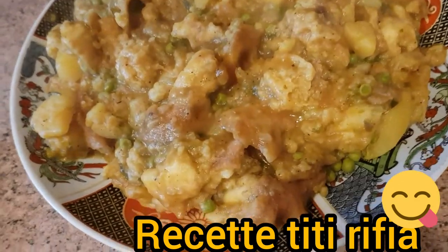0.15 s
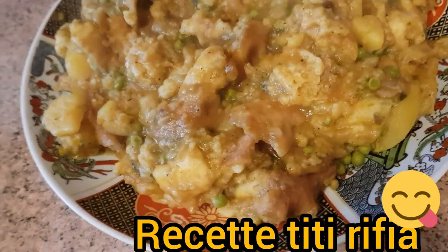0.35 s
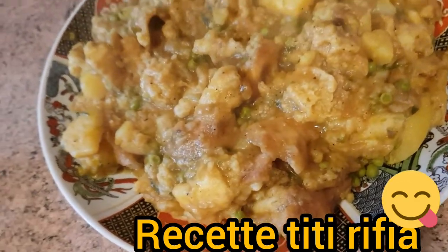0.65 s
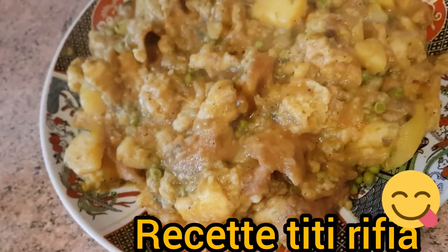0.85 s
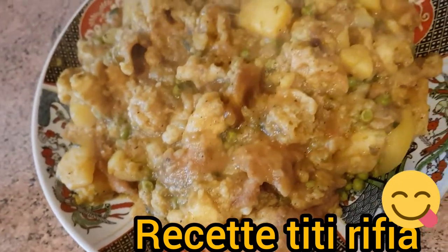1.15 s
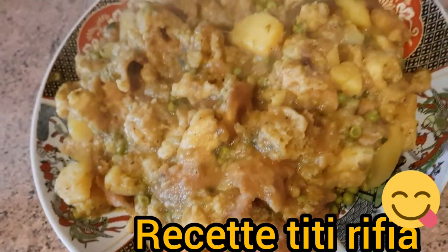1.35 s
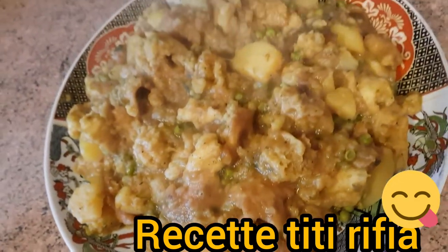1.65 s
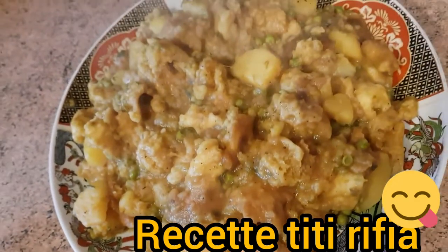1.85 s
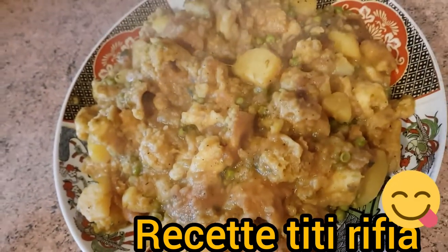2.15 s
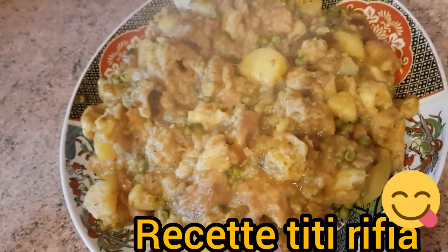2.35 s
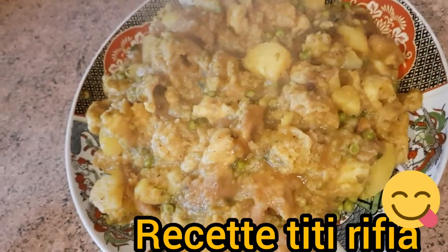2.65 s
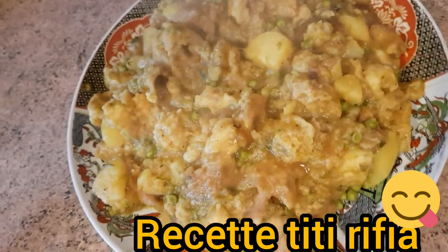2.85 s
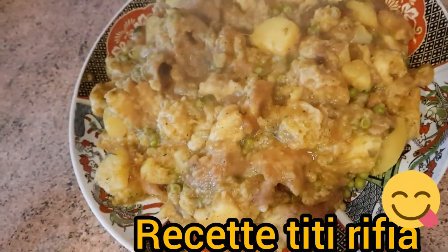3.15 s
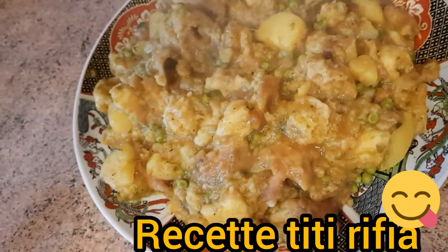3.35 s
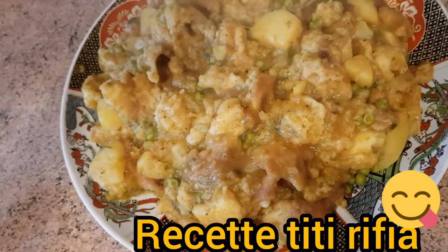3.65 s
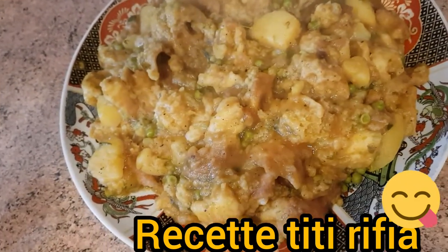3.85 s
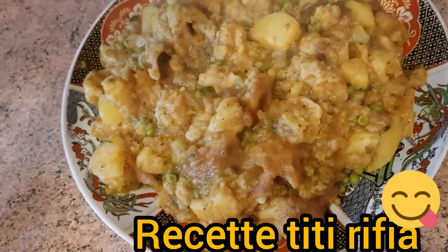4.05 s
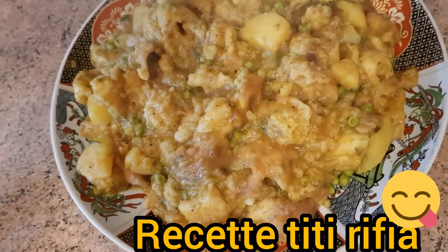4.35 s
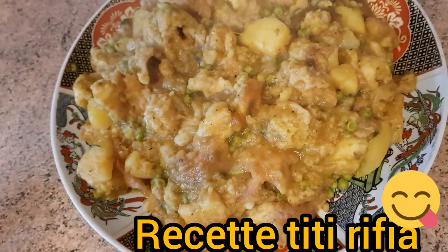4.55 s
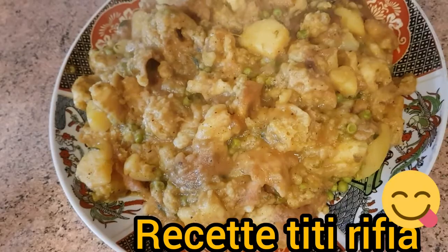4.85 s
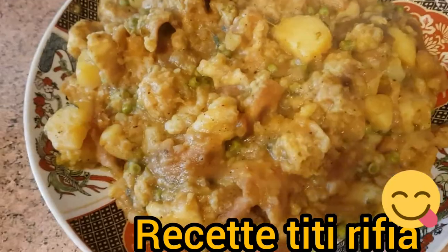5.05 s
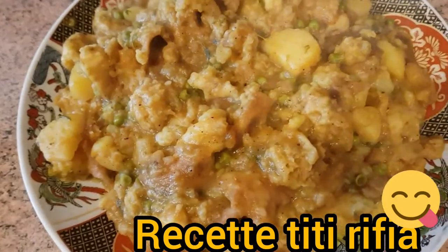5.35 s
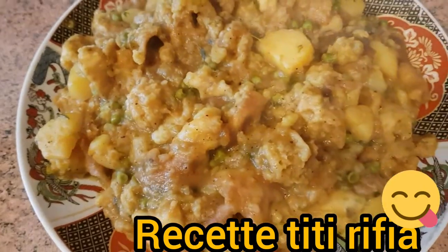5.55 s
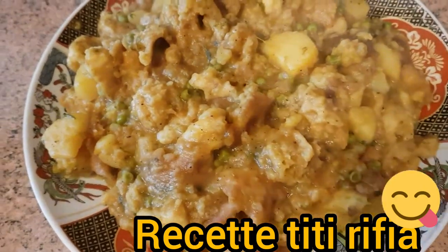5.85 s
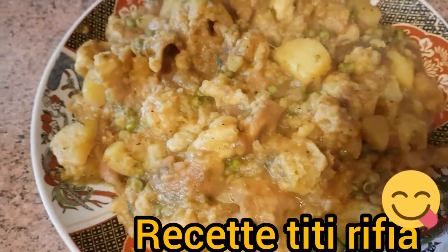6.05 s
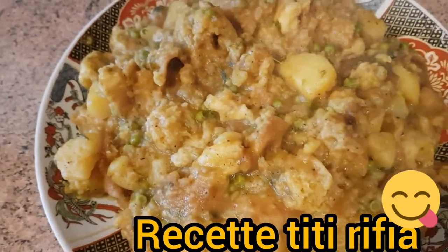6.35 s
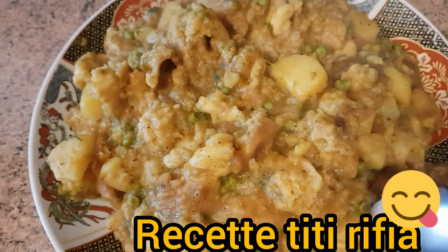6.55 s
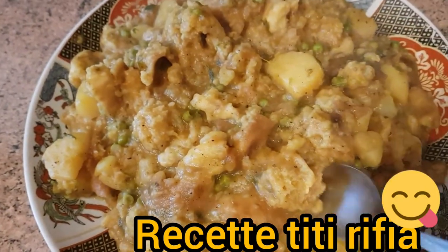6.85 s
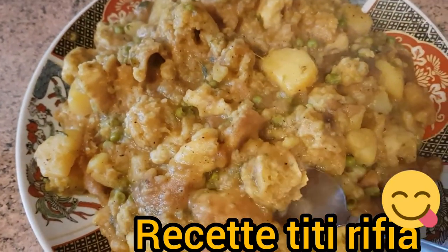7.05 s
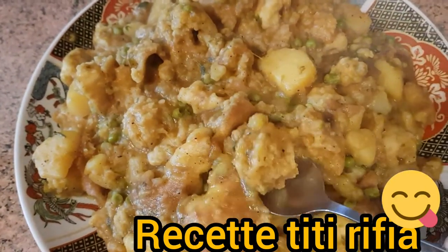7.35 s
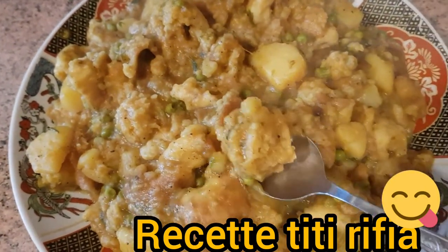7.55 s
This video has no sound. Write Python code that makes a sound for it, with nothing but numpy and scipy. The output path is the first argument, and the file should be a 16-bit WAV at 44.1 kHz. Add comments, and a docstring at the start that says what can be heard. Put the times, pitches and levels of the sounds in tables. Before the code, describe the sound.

A refrigerator hums and whines steadily in a quiet kitchen, a finger knocks loudly against the microphone, then a spoon ticks and squelches in saucy food.

```python
"""A refrigerator is heard first, in a quiet kitchen through a hand-held phone: shaft orders hum and whine,
a fan drones, and shaped noise gives moving air. A finger over the right microphone port bumps it (damped
oscillations of trapped air), then slips off with a loud knock that makes the gain control duck. A bird
chirps outside (falling tones); at 5.665 s the tones skip in phase and several levels step. Then a sleeve
rustles (shaped noise) and a spoon ticks and squelches in a dish (filtered bursts, decaying tones)."""
import sys
import numpy as np
from scipy.fft import rfft, irfft, next_fast_len
from scipy.io import wavfile
from scipy.ndimage import uniform_filter1d

SR = 44100
rng = np.random.default_rng(int(sys.argv[2]) if len(sys.argv) > 2 else 0)


def transcribe(signal):
    """Save signal, clipped to [-1, 1], as a 16-bit WAV file at the path in sys.argv[1]."""
    frames = np.atleast_2d(signal).T
    limited = np.clip(frames, -1, 1)
    pcm = np.round(limited * 32767).astype(np.int16)
    wavfile.write(sys.argv[1], SR, pcm)


N = 340011
TIME = np.arange(N) / SR
SKIP_AT_S, SKIPPED_S = 5.665, 0.28
AFTER = TIME > SKIP_AT_S
CLOCK = TIME + SKIPPED_S * AFTER  # time that drives the compressor phases

# Compressor tones, before PLACEMENT: [shaft order (rounded in use), left level/dB, right level/dB,
# change after the skip/dB]
HUM_ORDERS = [(1, -68.5, -70, 0), (2, -64, -63, 2), (3, -69, -66.5, 3), (7, -77.5, -77.5, -1),
              (9, -78.5, -75.5, -0.5), (11, -79.5, -74.5, 4), (12, -64.5, -66, 1.5), (13, -84, -73, -6.5),
              (20, -89, -89.5, 0.5), (23, -93, -85, -4.5), (30, -85, -96, 1)]
WHINE_ORDERS = [(51, -73.5, -71.5, 1.5), (55, -67.5, -59.5, -9), (56, -62.5, -64.5, -3.5),
                (57, -63.5, -67.5, -3), (60, -69.5, -71, -4), (58, -77, -80, 3.5), (61, -78.5, -77, 4.5),
                (62, -71, -66, -9), (67.63, -79.5, -71.5, -10), (73.8, -79.5, -74, 1), (80, -74.5, -72, 0),
                (87, -81, -74.5, -7), (114, -87, -80, 1), (164, -77.5, -85.5, 2.5)]
# Drift of the phone: [t/s, air level/dB, hum change/dB, whine change/dB, whine left-right/dB]
PLACEMENT = [(0, -63, 4.5, 0, -4.5), (.7, -59.5, 5.5, 1.5, -3.5), (1.5, -58, 3.5, -1, 3),
             (2.3, -58.5, -2, 2, -1.5), (2.8, -60, 1, 3, -2), (3.5, -58, 2.5, 1, 1),
             (4.5, -59, 0.5, 0.5, 0.5), (5.25, -59, 2.5, 1.5, 0.5), (5.45, -61, 0, 1, 1),
             (5.66, -58.5, 0, 2, 0), (5.67, -62, 1, -1, 0.5), (6.3, -60, 2, -.5, 1), (6.8, -62, 0.5, -1, 0),
             (7.71, -60, 0, -2.5, -1)]
# Noise spectra of low rumble, moving air, compressor casing and microphone hiss: [f/Hz, relative level/dB per Hz]
RUMBLE_SPECTRUM = [(20, -30), (36, -26), (46, -9), (56, 3), (75, -3), (120, -7), (170, -26), (260, -26),
                   (400, -59.5)]
AIR_SPECTRUM = [(88, -24.5), (150, 0.5), (236, -6.5), (304, -1.5), (490, -7.5), (625, -5.5), (752, -16.5),
                (982, -19.5), (1560, -27.5), (2320, -30), (2400, -20.5), (3120, -51.5), (5280, -120)]
CASING_SPECTRUM = [(700, -37), (1000, -17.5), (1300, -17), (2000, -26), (2400, -31), (2480, -6.5),
                   (2800, 1), (3300, -6), (3950, -3.5), (4900, -12), (5600, -6.5), (7200, -15.5),
                   (8100, -14), (9000, -26)]
HISS_SPECTRUM = [(4000, -42), (7000, -20.5), (9500, -11), (12500, 1), (14500, -4), (16000, -1)]
# Left-right likeness of the noise: [f/Hz, correlation -1 to 1]
LIKENESS = [(60, 0.98), (130, 0.85), (290, 0.67), (640, 0.059), (1410, -0.36), (3100, 0.26), (6820, -0.13),
            (15000, -0.01)]
# The blade tone sinks: [middle t/s, depth level/dB, half length/s]
FAN_DIPS = [(1.902, 13, 0.22), (2.95, 13, 0.45), (5.536, 12, 0.121)]
# Share of the port covered by the finger: [t/s, share 0-1]
COVER_SHARE = [(0, 0.96), (.9, .92), (1.3, 1)]
# The palm closes round the port: [t/s, share 0-1]
CUPPING_SHARE = [(.6, 0), (1.3, 0.2), (1.9, 0.6), (2.2, 1)]
# Transmission through the finger: [f/Hz, level/dB]
COVERED_RESPONSE = [(700, -1), (2500, -6), (4000, -14), (5500, -25.5), (7000, -24.5), (8500, -27),
                    (10500, -23.5)]
# Compressor tones that the cupped palm brings out: [shaft order, level/dB]
CUPPED_ORDERS = [(13, -70), (20, -70)]
# Noise spectra of skin rumble, rubbing skin and brushed cloth: [f/Hz, relative level/dB per Hz]
SKIN_SPECTRUM = [(15, -34), (35, -2), (55, 2.5), (100, -5), (180, -17.5), (350, -27.5), (700, -68)]
RUB_SPECTRUM = [(150, -25.5), (400, 5), (1500, -1), (3000, -8.5), (6000, -13), (8500, -28), (12000, -16),
                (16000, -24)]
CLOTH_SPECTRUM = [(700, -26), (1000, -10), (2200, -3), (5000, -2.5), (9000, -8.5), (13000, -3),
                  (16000, -10)]
# Rumble of resting skin: [t/s, level/dB]
RESTING_SKIN = [(0, -42), (.8, -44.5), (1.5, -42.5), (2.1, -47.5)]
# The finger shifts: [middle t/s, half length/s, rubbing level/dB, rumble level/dB]
FINGER_SHIFTS = [(0.645, 0.037, -60, -45.5), (0.828, 0.028, -66.5, -43.5), (2.165, 0.014, -42.5, -36),
                 (2.194, .013, -15.5, -28.5), (2.223, .013, -40, -44.5)]
# Bumps on the port: [t/s, level/dB, nominal f/Hz, rise time constant/ms, life/s, push -1 or pull 1]
PORT_BUMPS = [(.314, -28.5, 90, 1.5, 0.023, -1), (0.6601, -14.5, 90, 1.9, 0.017, -1),
              (1.179, -30.5, 130, 1.8, .02, -1), (1.85, -33.5, 91, 2, 0.025, -1),
              (2.152, -21.5, 80, 0.78, 0.017, -1), (2.1702, 6, 91, .3, 0.01765, 1),
              (2.2034, -5, 150, .3, 0.0052, 1)]
# A thud through the phone's body: one row, same columns
BODY_TAP = (5.622, -42, 60, 0.5, 0.16, 1)
# Skin letting go of the port edge: [t/s, level/dB]
SKIN_SLIPS = [(2.1645, -8.5), (2.1681, 0), (2.1693, 8), (2.17, 10.5), (2.1741, -12), (2.1936, 4.5),
              (2.194, -3), (2.1961, -12.5), (2.1982, -6), (2.2014, -3), (2.2032, 1)]
# Chirps: [t/s, level/dB, starting f/Hz]
CHIRPS = [(1.99, -62, 5010), (2.04, -55, 4530), (2.225, -55, 4550), (2.4, -53, 4590), (2.58, -50, 4600),
          (2.69, -58, 4560), (6.31, -62, 4500)]
# Strokes of the sleeve: [middle t/s, half length/s, level/dB]
SLEEVE_STROKES = [(6.048, 0.053, -61.5), (6.185, .06, -62.5), (6.314, .07, -64), (6.903, 0.44, -73.5),
                  (7.33, 0.149, -66)]
# Spoon ticks: [t/s, level before filtering/dB, centre f/Hz, width/Hz, t60/ms, left-right/dB]
SPOON_TICKS = [(6.8275, -37, 11400, 5000, 8.5, -3), (6.9123, -45, 9000, 6000, 7, -1),
               (6.9867, -42.5, 12100, 2525, 7, -5.5), (7.0101, -36.5, 3280, 4000, 11.5, 0),
               (7.1044, -45, 11500, 6980, 7, -2), (7.1463, -43.5, 11800, 2500, 7, -1),
               (7.228, -51, 1900, 1500, 130, 0), (7.258, -52, 11000, 4991, 7, -1),
               (7.2927, -45, 12000, 7020, 7, -1.5), (7.3206, -46, 8500, 5990, 12, 0),
               (7.3437, -42, 5800, 4000, 12, -2)]
# Air pockets popping in the sauce: [t/s, level before a 5 dB lift/dB, f/Hz]
AIR_POCKETS = [(7.121, -57, 871), (7.148, -53.5, 860), (7.177, -55, 880), (7.223, -53, 837),
               (7.252, -50.5, 852), (7.279, -51.5, 800.6), (7.321, -58.5, 850), (7.364, -58.5, 832),
               (7.408, -61, 874)]

SHAFT_HZ = 49.125
MAGNET_HZ, MAGNET_DB = 99.98, -63  # beats with the second shaft order; level before PLACEMENT
FAN_HZ, FAN_DB, FAN_AFTER_DB = 292.1, -60, -5  # blade tone; level change after the skip
RUMBLE_DB, RUMBLE_AFTER_DB = -59.5, 4.5
BASS_RETURN_S = 0.07
RELEASE_S = 2.17  # the finger leaves the port
PALM_HZ, PALM_WIDTH_HZ, PALM_DB = 994, 410, 4.3  # hollow of the palm
PORT_HZ, PORT_WIDTH_HZ, PORT_DB = 990, 1100, -12  # resonance of the port
RUB_DB, LIFTED_DB, FADE_DB_PER_S = -69.5, -49.5, 50  # resting rub; skin rumble after release and its fade
SLIP_HALF_S = 0.071e-3 * np.sqrt(2)
DUCK_THRESHOLD_DB, DUCK_DEPTH_DB, DUCK_HOLD_S, RECOVERY_DB_PER_S = -6, -10.5, 2, 9
TOP_HZ = 15780
LEFT_RIGHT = np.array([[1], [-1]])


def amp(db):
    """Level to amplitude: 20 dB is a factor of ten."""
    return 10 ** (np.asarray(db) / 20)


def unit(x):
    """Power normalisation: rms 1."""
    return x / np.sqrt(np.mean(x ** 2) + 1e-20)


def along(points, hz):
    """Interpolation on a logarithmic frequency axis."""
    f, v = np.transpose(points)
    return np.interp(np.log(hz + 1), np.log(f + 1), v)


def curves(rows):
    """Linear interpolation in time, one curve for each column after t."""
    s, *columns = np.transpose(rows)
    return [np.interp(TIME, s, column) for column in columns]


def wobble(rate):
    """Slow random modulation: straight lines between Gaussian knots, rate knots a second."""
    knots = rng.standard_normal(int(N * rate / SR) + 2)
    return np.interp(TIME * rate, np.arange(len(knots)), knots)


def swell(s, half, edge):
    """Generalised Gaussian hump of height 1; a larger edge makes it squarer."""
    return np.exp(-abs((TIME - s) / half) ** edge)


def filtered(x, response):
    """Linear filtering: the spectrum times a response, padded against wrap-around."""
    m = next_fast_len(N + SR // 2)
    return irfft(rfft(x, m) * response(np.fft.rfftfreq(m, 1 / SR)), m)[..., :N]


def mode(f, hz, width):
    """Driven damped oscillator: a causal resonance of gain 1 at its centre."""
    return 1j * f * width / (hz * hz - f * f + 1j * f * width)


def rush(spectrum, alike):
    """Partly coherent noise: mid and side shares set the left-right correlation; rms 1."""
    def shaping(hz):
        angle = np.arccos(np.clip(along(alike, hz), -1, 1)) / 2
        return amp(along(spectrum, hz)) * [np.cos(angle), np.sin(angle)]

    mid, side = filtered(rng.standard_normal((2, N)), shaping)
    return unit(np.array([mid + side, mid - side]))


def add(track, s, sound):
    """Superposition: mixes a short sound in at s seconds."""
    start = round(s * SR)
    track[..., start:start + sound.shape[-1]] += sound


def tones(table, scatter, drift_db, drift_turn):
    """Harmonics of shaft rotation; level and phase wander at each port as the phone drifts."""
    out = np.zeros((2, N))
    for order, *db, after_db in table:
        order = round(order)
        start = scatter * rng.uniform(0, 2 * np.pi)
        lag = order * 0.066  # radians between the ports
        for side in (0, 1):
            phase = 2 * np.pi * order * SHAFT_HZ * CLOCK + start - side * lag + drift_turn * wobble(2)
            level_db = db[side] + after_db * AFTER + drift_db * wobble(2)
            out[side] += np.sqrt(2) * amp(level_db) * np.sin(phase)
    return out


def casing_buzz(change_s):
    """Periodic excitation: valve knocks repeat each turn and ring the casing, with drifting order phases."""
    size = 2048  # steps in one turn
    out = np.zeros((2, N))
    step = (CLOCK * SHAFT_HZ % 1 * size).astype(int)
    colour = amp(along(CASING_SPECTRUM, np.arange(size // 2 + 1) * SHAFT_HZ))
    for s in np.arange(0, TIME[-1] + change_s, change_s):
        orders = rfft(rng.standard_normal((2, size)))
        turn = irfft(orders * abs(orders) * colour)  # a few orders stand out
        near = abs(TIME - s) < change_s
        crossfade = np.cos(np.pi / 2 * (TIME[near] - s) / change_s)
        out[:, near] += crossfade * turn[:, step[near]]
    return unit(out)


def fan_tone():
    """Blade passing: a sinusoid whose frequency and level waver."""
    dips_db = sum(depth_db * swell(s, half, edge=3) for s, depth_db, half in FAN_DIPS)
    level_db = FAN_DB + FAN_AFTER_DB * AFTER - dips_db + 1.2 * wobble(5) + 1.2 * LEFT_RIGHT
    phase = 2 * np.pi * np.cumsum(FAN_HZ + 0.9 * wobble(3)) / SR
    return np.sqrt(2) * amp(level_db) * np.sin(phase)


def fridge():
    """Superposed rotation, magnetic and flow sources: shaft orders, hum, casing buzz, fan and air."""
    air_db, hum_db, whine_db, pan_db = curves(PLACEMENT)
    hum = tones(HUM_ORDERS, scatter=0, drift_db=2.5, drift_turn=0.28)
    hum += np.sqrt(2) * amp(MAGNET_DB) * np.sin(2 * np.pi * MAGNET_HZ * (CLOCK + 0.0005))
    whine = tones(WHINE_ORDERS, scatter=0.992, drift_db=2.24, drift_turn=1.0)
    casing = amp(-62.5) * casing_buzz(change_s=0.96) + amp(-65.0) * rush(CASING_SPECTRUM, LIKENESS)
    air = amp(air_db + 0.44 * wobble(6)) * rush(AIR_SPECTRUM, LIKENESS)
    rumble_db = RUMBLE_DB + RUMBLE_AFTER_DB * AFTER + 1.5 * wobble(3.6)
    rumble = amp(rumble_db) * rush(RUMBLE_SPECTRUM, LIKENESS)
    gap = AFTER * swell(SKIP_AT_S, BASS_RETURN_S, edge=2)  # bass and air return slowly after the skip
    bass = (amp(hum_db) * hum + fan_tone() + rumble) * (1 - 0.73 * gap)
    treble = amp(whine_db + pan_db / 2 * LEFT_RIGHT) * (whine + casing)
    return bass + air * (1 - 0.38 * gap) + treble


def hiss():
    """Microphone self-noise: random pressure-like noise, uncorrelated between the ports."""
    return amp([[-68], [-67]]) * rush(HISS_SPECTRUM, [(50, 0)])


def skin_noise(on):
    """Frictional noise: skin rumbles and rubs on the port, more strongly when the finger shifts."""
    fading_db = LIFTED_DB - FADE_DB_PER_S * (TIME - RELEASE_S)  # the hand settles
    skin = amp(np.where(on, curves(RESTING_SKIN)[0], fading_db))
    rub = on * amp(RUB_DB)
    for s, half, rub_db, skin_db in FINGER_SHIFTS:
        rub = rub + amp(rub_db) * swell(s, half, edge=2.3)
        skin = skin + amp(skin_db) * swell(s, half, edge=3)
    rumble = skin * amp(1.9 * wobble(12)) * rush(SKIN_SPECTRUM, [(50, 0.99)])[0]
    return rumble + rub * amp(3.7 * wobble(300)) * rush(RUB_SPECTRUM, [(50, 0.93)])[0]


def bump(track, s, db, hz, rise_ms, life, way):
    """Softening spring: trapped air drives the membrane at a falling pitch as the skin lifts."""
    t = np.arange(SR // 5) / SR
    slowing = 0.021 * np.log1p(t / 0.02)  # elapsed time as the weakening spring counts it
    envelope = np.exp(-(t / life) ** 2) * (1 - np.exp(-1000 * t / rise_ms))
    sound = np.zeros_like(track)
    add(sound, s, np.sign(way) * amp(db) * envelope * np.cos(2 * np.pi * hz * slowing))
    return track + sound


def skin_slips():
    """Impulsive release: each slip is a short negative pulse that also rings the port."""
    pulses = -sum(amp(db) * swell(s, SLIP_HALF_S, edge=1.7) for s, db in SKIN_SLIPS)
    return pulses + amp(PORT_DB) * filtered(pulses, lambda f: mode(f, PORT_HZ, PORT_WIDTH_HZ))


def hand(sound):
    """Obstruction and cavity resonance: finger and palm colour the right port and add contact noise."""
    on = TIME < RELEASE_S
    cover = on * np.clip(curves(COVER_SHARE)[0], 0, 1)
    cup = curves(CUPPING_SHARE)[0] * ~AFTER
    out = sound + cup * amp(PALM_DB) * filtered(sound, lambda f: mode(f, PALM_HZ, PALM_WIDTH_HZ))
    cupped = [(order, db, db, 0) for order, db in CUPPED_ORDERS]
    out += cup ** 2 * tones(cupped, scatter=0, drift_db=0.0, drift_turn=0.2)[1]
    muffled = filtered(out, lambda f: amp(along(COVERED_RESPONSE, f)))
    out = (1 - cover) * out + cover * muffled + skin_noise(on)
    for row in PORT_BUMPS:
        out = bump(out, *row)
    return out + skin_slips()


def bird():
    """Frequency glide: far chirps fall in pitch, flutter at 45 Hz and blur into narrow noise."""
    out, t = np.zeros((2, N)), np.arange(SR // 6) / SR
    for s, db, hz in CHIRPS:
        envelope = (1 - np.exp(-t / 0.008)) * amp(-60 * t / 0.29)
        envelope *= 1 + 0.41 * np.sin(2 * np.pi * 45 * t)
        blur = np.cumsum(rng.standard_normal((2, len(t))), axis=1) * 0.054  # phase random walk
        add(out, s, amp(db) * envelope * np.sin(2 * np.pi * hz * t * (1 - 0.16 * t) + blur))
    return out


def body_tap():
    """Structure-borne sound: a damped thud through the phone's body, 5 dB weaker on the right."""
    return amp([[0], [-5]]) * bump(np.zeros(N), *BODY_TAP)


def sleeve():
    """Friction of cloth: grainy, wide noise shaped by brushing strokes."""
    strokes = sum(amp(db) * swell(s, half, edge=2) for s, half, db in SLEEVE_STROKES)
    grain_db = [[-2], [2]] + 2.5 * wobble(150) + 2.4 * wobble(30)
    return strokes * amp(grain_db) * rush(CLOTH_SPECTRUM, [(50, 0.2)])


def spoon():
    """Impact and bubble resonance: band-passed noisy ticks with a faint room tail, and round low pops."""
    out, t = np.zeros((2, N)), np.arange(2048) / SR
    f = np.fft.rfftfreq(len(t), 1 / SR)
    for s, db, hz, width, t60_ms, pan_db in SPOON_TICKS:
        decay = amp(-60 * 1000 * t / t60_ms) + amp(-15.5 - 60 * t / 0.2)  # tick, then tail
        burst = (rng.standard_normal((2, len(t))) + 2.7 * (t == 0)) * decay
        tick = irfft(rfft(burst) * mode(f, hz, width) ** 2)
        add(out, s, amp(db + pan_db / 2 * LEFT_RIGHT) * tick)
    for s, db, hz in AIR_POCKETS:
        envelope = (1 - np.exp(-t / 0.0018)) * amp(-60 * t / 0.061)
        blur = 0.08 * np.cumsum(rng.standard_normal((2, len(t))), axis=1)
        add(out, s, amp(db + 5.0) * envelope * np.sin(2 * np.pi * hz * t + blur))
    return out


def scene():
    """Superposition at two ports: the room, the right port under the hand, and microphone hiss."""
    left, right = fridge() + bird() + body_tap() + sleeve() + spoon()
    return np.array([left, hand(right)]) + hiss()


def record(dry):
    """Automatic gain control: a loud peak ducks both channels, holds, recovers; then the band limit."""
    loud = np.abs(dry).max(axis=0) > amp(DUCK_THRESHOLD_DB)
    last_loud = np.maximum.accumulate(np.where(loud, TIME, -99))
    recovered_db = RECOVERY_DB_PER_S * (TIME - last_loud - DUCK_HOLD_S)
    gain_db = np.clip(DUCK_DEPTH_DB + recovered_db, DUCK_DEPTH_DB, 0)
    ahead = 260  # samples of look-ahead
    gain_db = uniform_filter1d(np.append(gain_db[ahead:], np.zeros(ahead)), size=200)
    return filtered(dry * amp(gain_db), lambda hz: hz < TOP_HZ)


dry = scene()
out = record(dry)
transcribe(out)
```